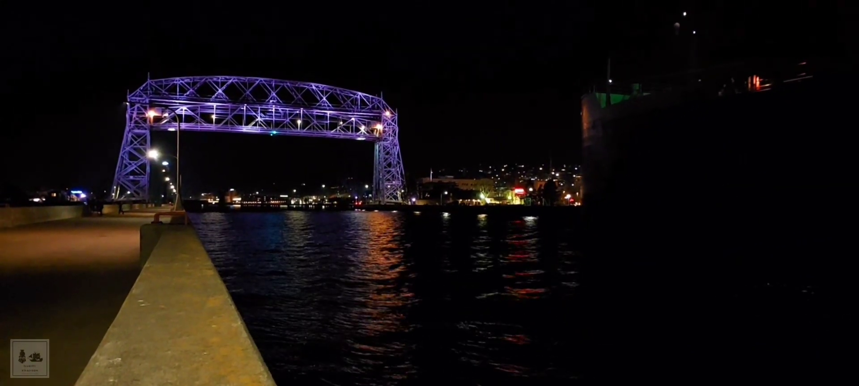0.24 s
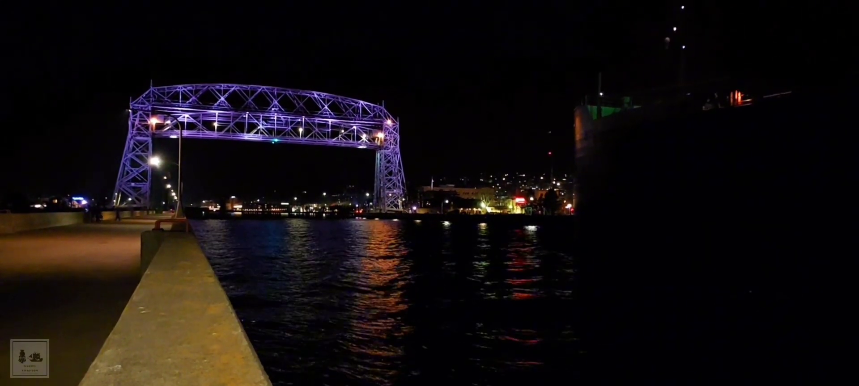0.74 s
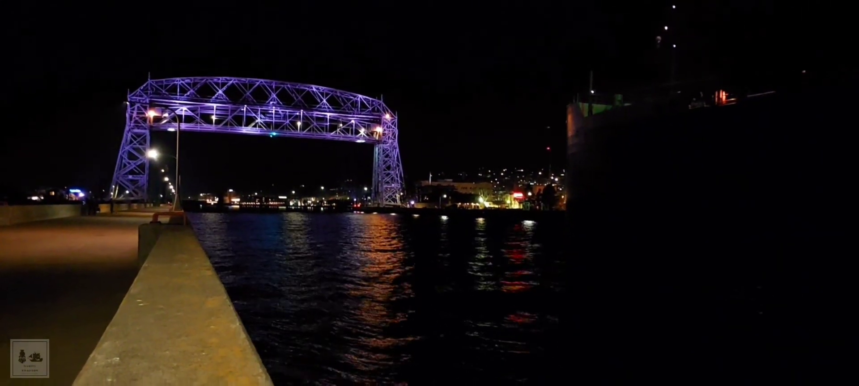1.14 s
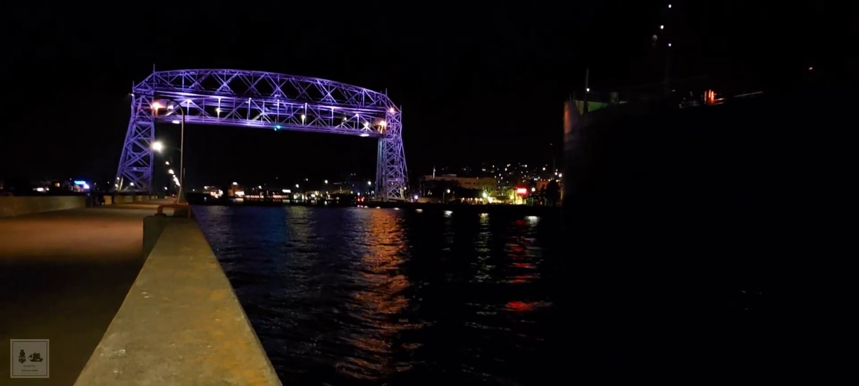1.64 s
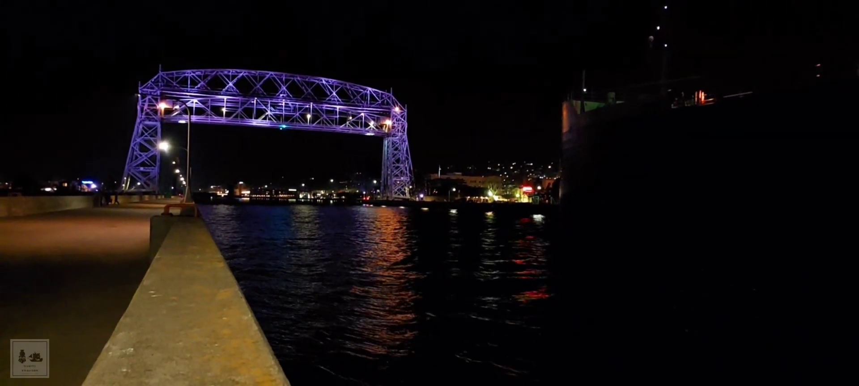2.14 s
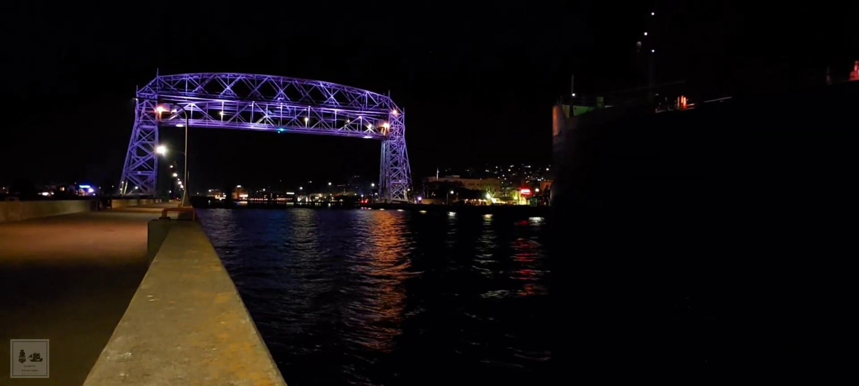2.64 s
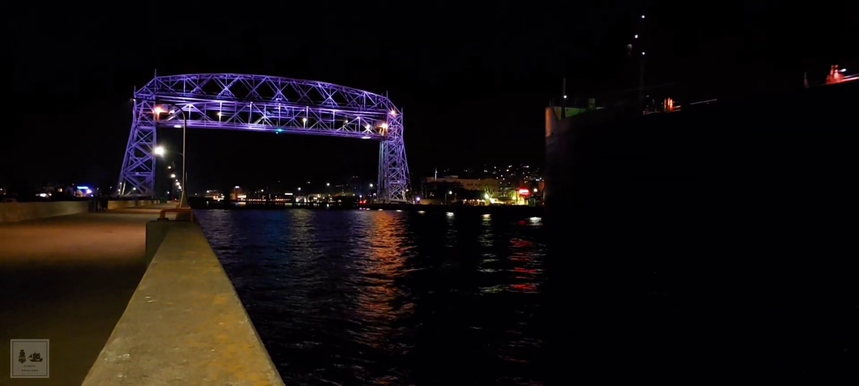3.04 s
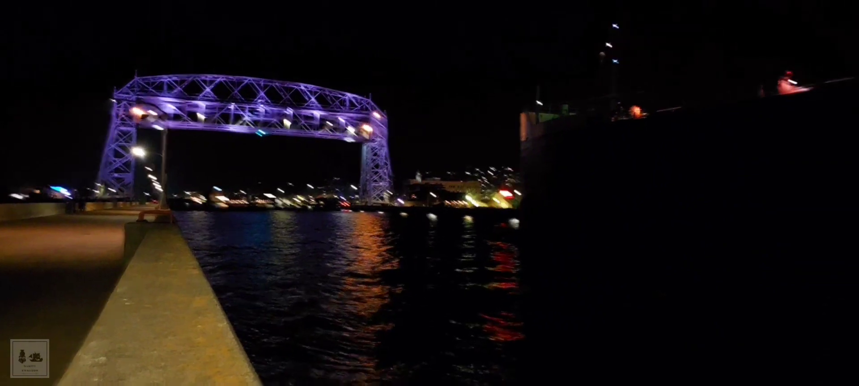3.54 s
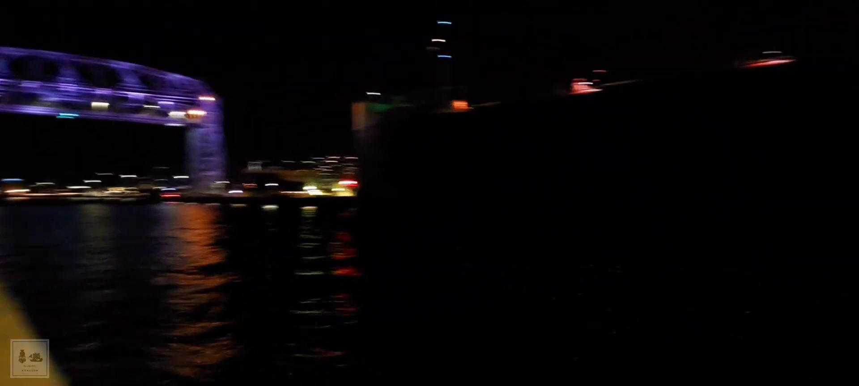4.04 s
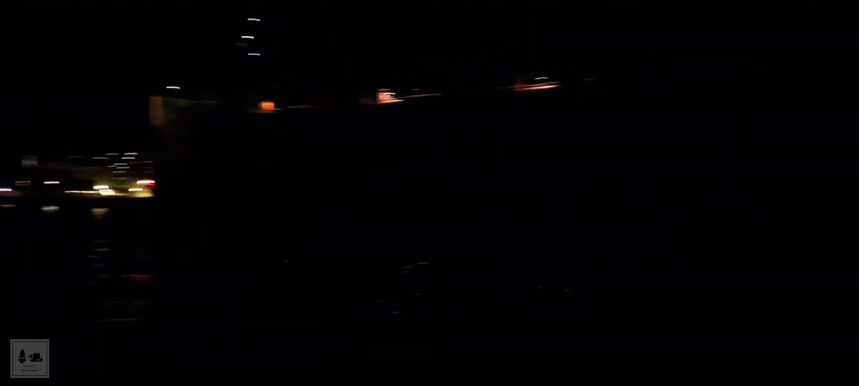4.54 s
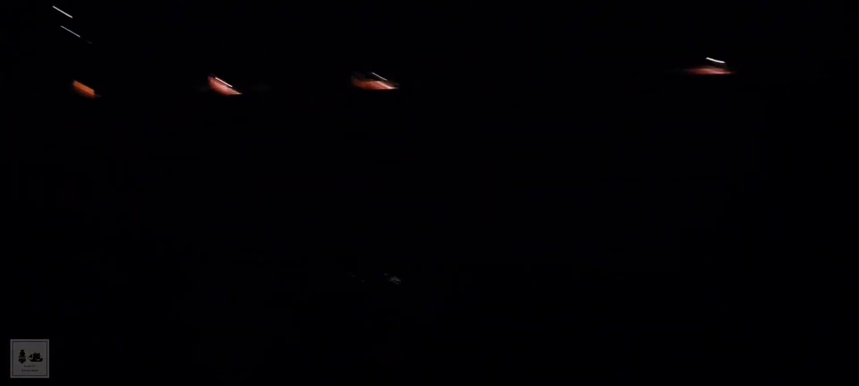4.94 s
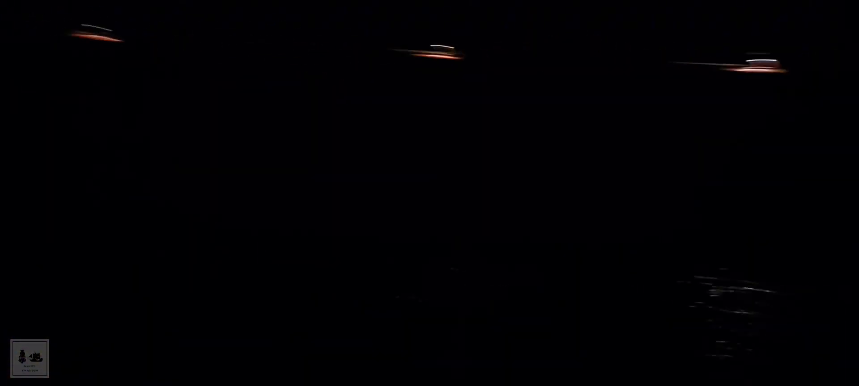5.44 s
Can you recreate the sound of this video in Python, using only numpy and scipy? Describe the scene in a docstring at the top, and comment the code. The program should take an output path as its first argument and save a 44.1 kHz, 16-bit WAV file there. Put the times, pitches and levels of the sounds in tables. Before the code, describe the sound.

A large freighter passes close to a pier at night, heard through a handheld stereo camera for nearly six seconds. A deep diesel boom near 55 Hz throbs about five times a second, with growling overtones, wavering machine hums, broad hull rumble and a muffled ventilator roar. Wash and fine spray hiss softly, with tiny laps. A low wind puff comes at 0.2 s; nearer splashes at 0.35, 0.5, 2.1 and 3.6 s. From 0.8 to 3 s a pump drone swells, rising slightly in pitch, then fades. Handling clicks snap at 1.4 and, more strongly, 1.6 s. From 3.7 s the camera swings toward the hull: boom and water strengthen, bass leans right, and wind buffets harder, gusting around 4.3 and 5.6 s. Close clicks cluster at 4.3 and 4.7-4.9, then scatter to 5.7 s. Sleeve cloth brushes faintly from 4.05, crackles near 4.75, and rubs loudest at 5.4-5.6 s, rightward.

```python
"""Freighter passing a pier

A slow diesel throbs as harmonics of its engine cycle, machines hum as wavering sine lines, and
shaped noise makes the hull's rumble, the ventilators' roar and the wash and spray along the hull.
A hand-held camera swings round to face the ship: levels, panning and the water's delay between its
two ports change. Small lapping splashes, light wind buffeting, a sleeve's filtered rustle,
the hand's faint rub and handling clicks that ring the case are heard close by."""
import sys
import numpy as np
from scipy import signal
from scipy.fft import rfft, irfft, next_fast_len
from scipy.io import wavfile
from scipy.ndimage import uniform_filter1d, map_coordinates

SR = 44100
rng = np.random.default_rng(int(sys.argv[2]) if len(sys.argv) > 2 else 0)


def materialize(psi):
    """Save the field psi as 16-bit PCM at rate SR to the path in sys.argv[1].

    A 1-D psi becomes a single channel; in a 2-D psi each row is a channel.
    """
    bounded = np.clip(np.atleast_2d(psi).T, -1, 1)
    quanta = np.round(bounded * 32767).astype(np.int16)
    wavfile.write(sys.argv[1], SR, quanta)


N = 250929

# correlation of the left and right noise: f/Hz, correlation coefficient
ALIKE = [(40, 0.34), (260, 0.98), (400, 0.093), (560, 0.15), (720, 0.58), (1000, 0.09), (1700, 0.024),
         (2700, 0.09), (4500, 0.036), (9000, 0.062)]
# fine treble of anything touching the camera: f/Hz, relative spectral level/dB
SHEEN = [(5000, -53), (8200, -20), (10000, -8), (13000, -5), (15500, -3.5)]

# the camera starts to turn; its ports open to the hull; it has swung right round
TURN_S, TURN_TAKES_S, SWING_TAKES_S = 3.68, 0.25, 1.67
ROOM_FROM_S, ROOM_UNTIL_S, ROOM_EDGE_S = 0.78, 2.95, 0.5  # the engine room slides by
BASS_PAN_DB = -6  # left minus right of the bass once the camera has turned

CYCLE_HZ = 5.034  # the engine cycle
BOOM_ORDER = 11  # the multiple of the cycle that the stack resonates with
BOOM_DB, BOOM_SLOPE_DB_PER_S = -35, -0.04  # starting level, steady drift
BOOM_TURN_DB, BOOM_SWING_DB = 6, -3.5  # change with the turn and with the swing
OVERTONE_DB, OVERTONE_ROOM_DB = -1, 3.5  # gain of the higher exhaust lines; extra beside the engine room
OVERTONE_TURN_LOSS_DB = 1.5  # what the higher exhaust lines lose with the turn
THROB_S = 0.02492  # lines near the boom swell together here, and once in every cycle after
THROB_SPAN_ORDERS = 8  # distance from the boom at which the phases scatter fully
PUMP_DB, PUMP_ROOM_DB = -60, 16.5  # level; gain beside the engine room
PUMP_HZ, PUMP_RISE_HZ = 111.5, 3.5  # starting pitch, and its climb while the engine room passes

RUMBLE_DB, RUMBLE_FADE_DB_PER_S = -41.5, 0.37  # the hull rumble recedes
VENT_DB, VENT_TURN_DB, VENT_SWING_DB = -50.5, 2.35, -1.1  # level; change with the turn and with the swing
SWEEP_S, SWEEP_HALF_S = 4.49, 0.48  # the camera sweeps across the ventilators
RUMBLE_SWEEP_DB, VENT_SWEEP_DB = 1.5, 1  # gains in that sweep

WASH_DB, WASH_TURN_DB, LAPS_DB = -56, 4.5, -9.5  # level; gain with the turn; wavelets against the wash
SPRAY_DB, SPRAY_TURN_DB = -58, 3  # level; gain with the turn
SURGE_DB, SURGES_PER_S = .2, 2.7  # random waver of the water: scale, rate
WATER_ROOM_DB, WATER_SWING_DB = 0.5, -1.6  # change beside the engine room, and with the swing
LAG_BEFORE_MS, LAG_AFTER_MS = 0.45, -0.41  # lag of the left port, before and after the swing

GRIP_DB, GRIP_PAN_DB = -74.5, -5.5  # level, left minus right
WIND_DB, WIND_TURN_DB = -51, 11  # level in the lee; gain with the turn
GUST_S = 0.43  # half length of a gust
NEAR_LAP_HALF_S = 0.014  # half length of a nearer splash
CRACK_T60_S = 0.0072  # decay time of a click's crack
PORT_SPREAD = .35  # largest share of a cycle added at random to a mode's phase at each port

STROKE_BRIGHTENS_DB, STROKE_SAGS_DB = 2, 4  # sheen's rise and body's fall through a stroke
STROKE_EDGE_SHARE = 0.26  # share of a stroke's length that its rise takes, and its fall
WEAVE_DB = 1.3  # fine roughness of the weave, rms
PRESSURE_DB, PRESSURE_PER_S = 1, 35  # slower changes of pressure: scale, rate
SNAGS_PER_S, SNAG_S = 210, 0.0012  # how often the cloth catches; time constant of a catch's power

TOP_HZ = 15850  # band limit of the camera


def amp(db):
    """Level and amplitude: converts decibels to gain."""
    return 10 ** (np.asarray(db) / 20)


def unit(x):
    """Normalization: scales a signal to rms 1."""
    return x / np.sqrt(np.mean(x ** 2) + 1e-20)


def along(points, hz):
    """Logarithmic frequency scale: interpolates (f/Hz, value) points."""
    f, v = np.transpose(points)
    return np.interp(np.log(hz + 1), np.log(f + 1), v)


def colour(points, hz):
    """Spectral shaping: gain that follows the points and falls away beyond both ends."""
    low_edge = np.minimum(1, hz / points[0][0])
    high_edge = np.minimum(1, points[-1][0] / (hz + 1)) ** 2
    return amp(along(points, hz)) * low_edge * high_edge


def wobble(rate):
    """Slow random modulation: a smooth curve through rate random knots a second."""
    coarse = np.linspace(0, N / SR * rate, N // 256)
    smooth = map_coordinates(rng.standard_normal(256), [coarse + 2], mode="wrap")
    return np.interp(np.linspace(0, 1, N), np.linspace(0, 1, len(smooth)), smooth)


def ramp(start_s, takes_s):
    """Raised-cosine transition: a smooth step from 0 to 1."""
    return np.sin(np.pi / 2 * np.clip((np.arange(N) / SR - start_s) / takes_s, 0, 1)) ** 2


def swell(start_s, end_s, edge_s):
    """Raised-cosine envelope: rises, holds at 1, falls."""
    return ramp(start_s, edge_s) * (1 - ramp(end_s - edge_s, edge_s))


def bump(centre_s, half_s):
    """Gaussian envelope: rises to 1 and falls, down to 1/e at half_s from the centre."""
    return np.exp(-((np.arange(N) / SR - centre_s) / half_s) ** 2)


def filtered(x, response):
    """Linear filtering: multiplies the spectrum by a complex frequency response."""
    m = next_fast_len(N + SR // 2)
    return irfft(rfft(x, m) * response(np.fft.rfftfreq(m, 1 / SR)), m)[..., :N]


def panned(pan_db):
    """Interchannel level difference: left and right gains of mean 1."""
    gains = amp(np.array([np.atleast_1d(pan_db), -np.atleast_1d(pan_db)]) / 2)
    return gains / gains.mean(axis=0)


def rush(spectrum, alike, patchy_db):
    """Turbulence noise: partly correlated stereo of rms 1, with time-frequency patches of random gain."""
    z = signal.stft(rng.standard_normal((2, N)), nperseg=512)[2]
    field = uniform_filter1d(rng.standard_normal(z.shape[1:]), size=6, axis=0)
    field = uniform_filter1d(field, size=14, axis=1)
    pair = signal.istft(z * amp(patchy_db * unit(field)), nperseg=512)[1][:, :N]

    def mid_side(hz):
        # these shares of mid and side give the wanted correlation
        turn = np.arccos(np.clip(along(alike, hz), -1, 1)) / 2
        return colour(spectrum, hz) * [np.cos(turn), np.sin(turn)]

    mid, side = filtered(pair, mid_side)
    return unit(np.array([mid + side, mid - side]))


def tone(hz, waver_db, drift, start_turns=None):
    """Propagation fluctuation: a line of rms 1 whose level and phase wander on the way over the water."""
    start = rng.random() if start_turns is None else start_turns
    phase = 2 * np.pi * (hz * np.arange(N) / SR + start) + drift * wobble(2.22)
    return unit(np.sin(phase) * amp(waver_db * wobble(2.34)))


def motion():
    """Relative motion as controls from 0 to 1: engine room alongside, camera turned, camera swung round."""
    alongside = swell(ROOM_FROM_S, ROOM_UNTIL_S, ROOM_EDGE_S)
    return alongside, ramp(TURN_S, TURN_TAKES_S), ramp(TURN_S, SWING_TAKES_S)


def diesel(alongside, turned, swung):
    """Harmonic series: unequal cylinders excite multiples of the cycle, in step near the stack's boom."""
    # exhaust lines: multiple of the engine cycle, level/dB before the gains below
    exhaust = [(7, -55), (10, -52), (12, -42), (13, -55), (16, -39), (17, -45), (18, -46), (19, -50),
               (22, -52), (23, -47), (24, -54), (25, -46), (26, -43), (27, -52), (28, -51), (29, -48),
               (31, -50), (32, -55), (33, -51), (35, -55), (40, -60), (46, -57), (53, -60), (55, -60)]
    # brief swell of the boom: centre t/s, half length/s, gain/dB
    swell_s, swell_half_s, swell_db = (2.7, 0.45, 1.8)
    boom_db = BOOM_DB + BOOM_SLOPE_DB_PER_S * np.arange(N) / SR
    boom_db = boom_db + BOOM_TURN_DB * turned + BOOM_SWING_DB * swung
    boom_db = boom_db + swell_db * bump(swell_s, swell_half_s)
    pan_db = BASS_PAN_DB * turned
    overtone_db = OVERTONE_DB + OVERTONE_ROOM_DB * alongside - OVERTONE_TURN_LOSS_DB * turned
    crank = rng.random()
    out = amp(boom_db) * tone(BOOM_ORDER * CYCLE_HZ, .2, .03, crank) * panned(pan_db)
    for order, db in exhaust:
        apart = order - BOOM_ORDER
        scatter = min(1, abs(apart) / THROB_SPAN_ORDERS) * (rng.random() - .5)
        start_turns = crank - apart * CYCLE_HZ * THROB_S + scatter
        # the short waves are shaded by the hull; the long ones gather beside it
        short = np.clip(order * CYCLE_HZ / 40 - 2, 0, 1)
        line = tone(order * CYCLE_HZ, .3 + .6 * short, .04 + .1 * short, start_turns)
        out += amp(db + short * overtone_db) * line * panned((1 - short) * pan_db)
    return out


def machinery(alongside):
    """Tonal machine noise: each machine is loudest abeam; a pump's harmonics drone by the engine room."""
    # fans and generators along the hull: f/Hz, level abeam/dB, level waver scale/dB,
    # phase drift scale/rad, abeam at t/s, time until 3 dB down/s
    machines = [(71.3, -47, 1.5, .2, 4.5, 1.9), (108.3, -49.5, 2, .2, 1.5, 1),
                (161.5, -51.5, 2, .6, 2.2, 1), (220.4, -46, 1.5, .4, .7, 1.2),
                (225.5, -49.5, 2.5, 1.6, 4.3, .9), (240.6, -47, 1.5, .25, 1.8, 4.5),
                (280.4, -60, 2, .4, 3, 2), (308, -63, 2, .4, 1.5, 3), (321, -62, 2, .5, 2.5, 1.5),
                (340, -56, 2, 1, 4.5, .35), (362.9, -56.5, 2, .35, 4.5, 4), (440.9, -56, 3, .8, 2, 1.5),
                (468.3, -53.5, 2.2, .5, 4.1, 1.7)]
    # pump harmonics: multiple of its pitch, relative level/dB
    pump_orders = [(1, 0.5), (2, -3.5), (3, -8)]
    t = np.arange(N) / SR
    hums = 0
    for hz, db, waver_db, drift, abeam_s, pass_s in machines:
        passing = 1 / np.hypot(1, (t - abeam_s) / pass_s)
        hums = hums + amp(db) * passing * tone(hz, waver_db, drift)
    pump_hz = PUMP_HZ + PUMP_RISE_HZ * ramp(ROOM_FROM_S, ROOM_UNTIL_S - ROOM_FROM_S)
    turns = np.cumsum(pump_hz) / SR
    pump = sum(amp(db) * np.sin(2 * np.pi * (order * turns + rng.random())) for order, db in pump_orders)
    return hums + amp(PUMP_DB + PUMP_ROOM_DB * alongside) * unit(pump)


def hull(turned, swung):
    """Broadband radiation: a receding rumble and a ventilator roar, both lifted as the camera sweeps past."""
    # hull rumble: f/Hz, relative spectral level/dB
    rumble = [(18, -12), (45, -5), (80, -6), (112, -4), (160, -6.5), (192, -12), (222, -3), (243, -7),
              (262, -4), (290, -8), (335, -10), (370, -17), (470, -22), (700, -50)]
    # ventilators: f/Hz, relative spectral level/dB
    roar = [(200, -19.5), (380, -1), (520, -3), (750, -2.5), (950, -12), (1300, -21)]
    sweep = bump(SWEEP_S, SWEEP_HALF_S)
    rumble_db = RUMBLE_DB - RUMBLE_FADE_DB_PER_S * np.arange(N) / SR + RUMBLE_SWEEP_DB * sweep
    vent_db = VENT_DB + VENT_TURN_DB * turned + VENT_SWING_DB * swung + VENT_SWEEP_DB * sweep
    return amp(rumble_db) * rush(rumble, ALIKE, patchy_db=.8) + amp(vent_db) * rush(roar, ALIKE, patchy_db=1.2)


def laps(count=240, spread_db=2, lap_hz=1750):
    """Superposed transients: wavelets lap at the pier, each a brief splash at its own pitch, rms 1 in all."""
    t, out = np.arange(SR // 20) / SR, np.zeros(N + SR)
    for when, (size, pitch) in zip(rng.random(count), rng.standard_normal((count, 2))):
        hz = lap_hz * np.exp(.27 * pitch)
        # slow noise on a carrier makes a narrow band
        splash = uniform_filter1d(rng.standard_normal(len(t)), size=110) * np.sin(2 * np.pi * hz * t)
        envelope = t * np.exp(-t / .006)
        out[int(when * N):][:len(t)] += amp(spread_db * np.clip(size, -2, 1.5)) * splash * envelope
    return unit(out[:N])


def water(alongside, turned, swung):
    """Interchannel delay: wash and spray along the hull cross from right to left as the camera swings."""
    # wash: f/Hz, relative spectral level/dB
    wash_spectrum = [(500, 4), (740, -3), (1000, 5.5), (1250, 4), (1420, -3.5), (1700, 5), (2000, -2.5),
                     (2600, -7), (4000, -18.5)]
    # spray: f/Hz, relative spectral level/dB
    spray_spectrum = [(1200, 8), (2600, 4.5), (3500, 4), (5000, 3.5), (6100, -0.5), (7000, -12),
                      (8300, -19.5), (10000, -13), (12500, -40), (15500, -16)]
    # balance of the spray: f/Hz, left minus right level/dB
    spray_pan = [(2500, 0.5), (4000, -2.5), (6000, -9.5), (8000, 7), (14000, -13)]
    flow_db = SURGE_DB * wobble(SURGES_PER_S) + WATER_ROOM_DB * alongside + WATER_SWING_DB * swung
    lag_ms = LAG_BEFORE_MS + (LAG_AFTER_MS - LAG_BEFORE_MS) * swung
    flow = rush(wash_spectrum, ALIKE, patchy_db=1)
    fizz = rush(spray_spectrum, ALIKE, patchy_db=1.1)
    wash = amp(WASH_DB + WASH_TURN_DB * turned + flow_db) * (flow + amp(LAPS_DB) * laps())
    spray = amp(SPRAY_DB + SPRAY_TURN_DB * turned + flow_db) * fizz
    left, right = wash + filtered(spray, lambda hz: panned(along(spray_pan, hz)))
    return np.array([map_coordinates(left, [np.arange(N) - lag_ms * SR / 1000]), right])


def grip():
    """Friction noise: the hand rubs faintly and unevenly on the camera all the while."""
    rub = amp(2.2 * wobble(18)) * rush(SHEEN, ALIKE, patchy_db=2.5)
    return amp(GRIP_DB) * rub * panned(GRIP_PAN_DB)


def wind(turned):
    """Pressure fluctuation: low lumps of air hit the ports in gusts, harder once the camera turns."""
    # buffeting: f/Hz, relative spectral level/dB
    buffet = [(15, -29), (42, 1.5), (75, 5), (130, 1.5), (180, -6), (300, -36)]
    # gusts: t/s, gain/dB
    gusts = [(.17, 15.5), (4.32, 7), (5.62, 7)]
    gust_db = sum(db * bump(s, GUST_S) for s, db in gusts)
    lumps = unit(amp(1.2 * wobble(9)) * rush(buffet, [(60, 1.0)], patchy_db=.8))  # the same at both ports
    return amp(WIND_DB + WIND_TURN_DB * turned + gust_db) * lumps * panned(BASS_PAN_DB * turned)


def near_laps():
    """Gated noise: a few wavelets splash softly right below the camera."""
    # splashes: t/s, level/dB
    lap_times = [(.35, -59), (.53, -58), (2.06, -55), (3.63, -55)]
    # splash: f/Hz, relative spectral level/dB
    splash = [(1200, -14), (1750, 0), (2400, -4), (3500, -18)]
    return sum(amp(db) * bump(s, NEAR_LAP_HALF_S) for s, db in lap_times) * rush(splash, ALIKE, patchy_db=1)


def clicks():
    """Modal excitation: fingers shift, and each snap cracks and rings the case modes nearest its pitch."""
    # modes of the camera's case: f/Hz, relative level/dB, t60/s
    case_modes = [(1300, -5, .006), (1640, 0, .009), (2100, -6, .005), (2670, 2, .009), (3270, -5, .01),
                  (3800, 0, .005), (4450, -2, .005), (5000, -4, .004), (5560, 0, .005), (6100, -3, .004)]
    # crack: f/Hz, relative spectral level/dB
    crack_spectrum = [(3000, -2), (6500, 6.5), (8000, -9), (10500, -2.5), (12500, -7), (15500, -6)]
    # handling clicks: t/s, ring level/dB, pitch f/Hz, width/octaves, crack level/dB, crack left minus right/dB
    snaps = [(1.3882, -26.5, 4840, 0.48, -49, 12), (1.5773, -27.5, 1800, 0.33, -45, 0),
             (1.5792, -26, 2590, 2.8, -28.5, -4), (4.069, -52, 5500, .4, -48, 10),
             (4.3268, -29.5, 3160, 0.11, -49, -2), (4.3282, -31, 5370, .2, -50, 4),
             (4.707, -39, 5400, 0.4, -45, -5), (4.733, -41, 3800, .4, -43, 2),
             (4.747, -38, 3300, 0.27, -56, -4), (4.769, -33.5, 1750, .2, -53, -2),
             (4.7977, -36, 5400, 0.25, -58, 3), (4.802, -50, 5500, .4, -42, 3),
             (4.878, -39, 1500, .3, -53, -2), (5.094, -30, 4180, .24, -36.5, -5),
             (5.212, -32, 5350, .15, -64, 2), (5.67, -37, 4400, 0.093, -60, -8)]
    t, out = np.arange(SR // 20) / SR, np.zeros((2, N + SR))
    hz, mode_db, t60 = np.transpose(case_modes)[:, :, None]
    onset = 1 - np.exp(-t / .0002)
    crack_gain = colour(crack_spectrum, np.fft.rfftfreq(len(t), 1 / SR))
    for s, ring_db, pitch_hz, octaves, crack_db, crack_pan_db in snaps:
        weight = amp(mode_db) * np.exp(-(np.log2(hz / pitch_hz) / octaves) ** 2 / 2)
        phase = rng.random((len(case_modes), 1)) + PORT_SPREAD * rng.random((2, len(case_modes), 1))
        modes = weight * amp(-60 * t / t60) * np.sin(2 * np.pi * (hz * t + phase))
        ring = np.sum(modes, axis=1) * onset / np.linalg.norm(weight)
        noise = irfft(rfft(rng.standard_normal((2, len(t)))) * crack_gain, len(t))
        crack = unit(noise) * amp(-60 * t / CRACK_T60_S) * onset * panned(crack_pan_db)
        out[:, round(s * SR):][:, :len(t)] += amp(ring_db) * ring + amp(crack_db) * crack
    return out[:, :N]


def contact(count, body_hz, octaves, sheen_db, sheen_pan_db):
    """Contact noise: a broad body resonance and a sheen favouring the nearer port, rms 1 together."""
    size = next_fast_len(count)
    hz = np.fft.rfftfreq(size, 1 / SR)
    edge_hz = max(7000, 1.2 * body_hz)
    resonance = 1 / (1 + (np.log2((hz + 1) / body_hz) / octaves) ** 2 / 2)
    body = resonance / (1 + (hz / edge_hz) ** 12)
    sheen = amp(sheen_db) * colour(SHEEN, hz) * panned(sheen_pan_db)
    noise = rfft(rng.standard_normal((2, size)))
    parts = np.array([irfft(noise * gain, size)[:, :count] for gain in (body, sheen)])
    return parts / np.std(sum(parts))


def snags():
    """Stick-slip: power of random, quickly dying catches in the cloth, mean 1."""
    catches = (rng.random(N) < SNAGS_PER_S / SR) * rng.random(N)
    power = signal.lfilter([1], [1, -np.exp(-1 / (SNAG_S * SR))], catches)
    return power / power.mean()


def sleeve():
    """Sliding friction: cloth strokes start dull and end bright, crackling as the weave catches."""
    # strokes: start t/s, end t/s, level/dB, body f/Hz, body width/octaves, sheen gain/dB,
    # sheen left minus right/dB, crackle (0-1)
    strokes = [(4.05, 4.093, -67, 4500, .3, 4, 8, .3), (4.11, 4.303, -73, 10400, .08, -9, 7, .3),
               (4.255, 4.613, -58.5, 3770, .32, -13, 7, 0.5), (4.28, 4.647, -72, 10600, .06, -11, 3, 0),
               (4.698, 4.733, -56, 5470, 0.2, -12, -6, .4), (4.715, 4.801, -51.5, 2900, 0.39, -9, 4, 0.64),
               (4.712, 4.83, -65, 5000, .3, 9, 3, 0.6), (4.78, 5.034, -71, 10800, .08, 2, 6, .3),
               (4.875, 4.888, -45, 1040, 0.12, -39, 0, 0), (5.098, 5.405, -70, 4000, .27, 10, 6, .4),
               (5.375, 5.577, -55.5, 2700, 0.27, -23, -7, 0.2),
               (5.377, 5.545, -46, 5170, 0.18, -12, -11, 0), (5.443, 5.64, -49.5, 4700, 0.23, -4, -13, 0.2),
               (5.53, 5.63, -66, 15300, 0.038, -20, -7, .1)]
    t, out = np.arange(N) / SR, np.zeros((2, N))
    weave_db = WEAVE_DB * unit(uniform_filter1d(rng.standard_normal(N), size=150))
    rough = amp(weave_db + PRESSURE_DB * wobble(PRESSURE_PER_S))
    catches = snags()
    for start, end, db, body_hz, octaves, sheen_db, sheen_pan_db, crackle in strokes:
        progress = np.clip((t - start) / (end - start), 0, 1) - .5
        grain = np.sqrt(1 + np.clip(crackle, 0, 1) * (catches - 1))
        body, sheen = contact(N, body_hz, octaves, sheen_db, sheen_pan_db)
        rub = body * amp(-STROKE_SAGS_DB * progress) + sheen * amp(STROKE_BRIGHTENS_DB * progress)
        envelope = swell(start, end, STROKE_EDGE_SHARE * (end - start))
        out += amp(db) * rough * grain * envelope * rub
    return out


def scene():
    """Superposition: the ship and the small sounds at the camera add."""
    alongside, turned, swung = motion()
    ship = diesel(alongside, turned, swung) + machinery(alongside) + hull(turned, swung)
    ship = ship + water(alongside, turned, swung)
    return ship + grip() + wind(turned) + near_laps() + clicks() + sleeve()


def record(dry):
    """Interchannel phase: the two ports differ in phase, and the camera keeps nothing above its band limit."""
    # phase between the ports: f/Hz, lead of the left port/rad
    port_phase = [(50, 0.41), (90, 0.95), (140, 0.34), (260, 0.34), (360, 1), (470, -1.23), (650, 0.39),
                  (1000, -0.29)]
    eased = dry * swell(0, N / SR, .004)

    def response(hz):
        phase = np.outer([1, -1], along(port_phase, hz)) / 2
        return np.exp(1j * phase) * (hz < TOP_HZ)

    return filtered(eased, response)


dry = scene()
out = record(dry)
materialize(out)
```